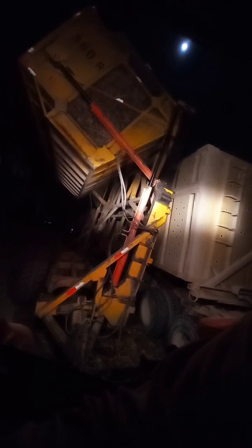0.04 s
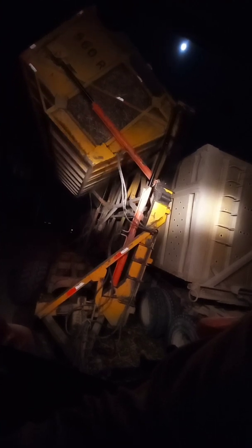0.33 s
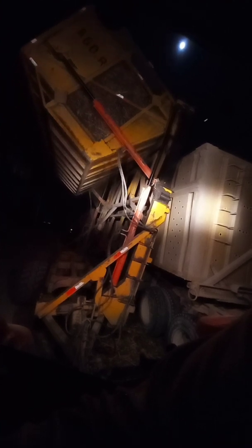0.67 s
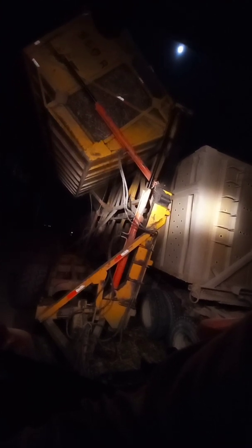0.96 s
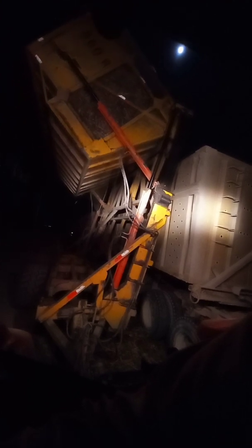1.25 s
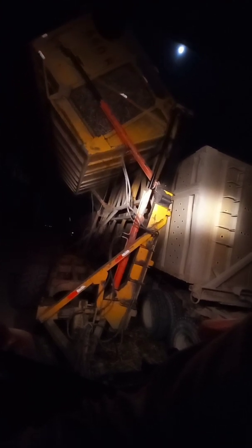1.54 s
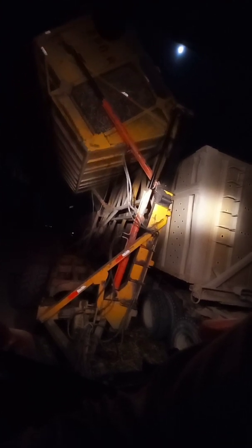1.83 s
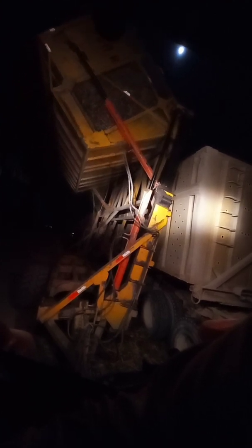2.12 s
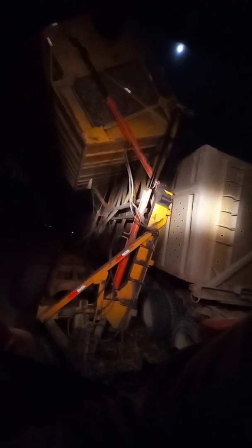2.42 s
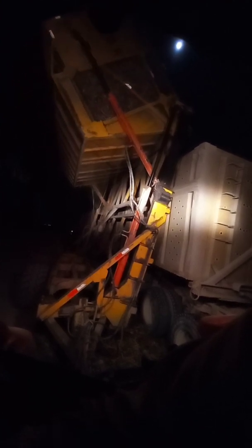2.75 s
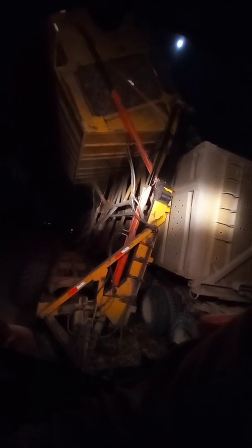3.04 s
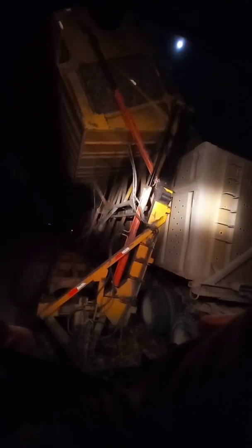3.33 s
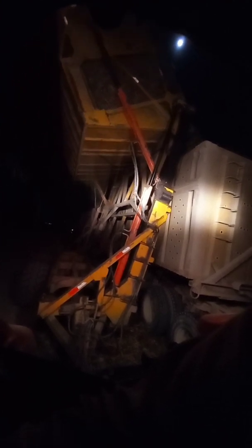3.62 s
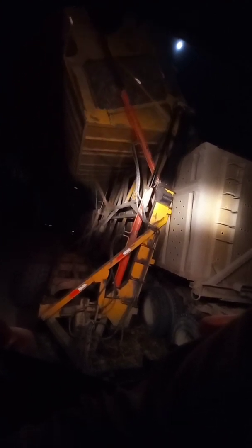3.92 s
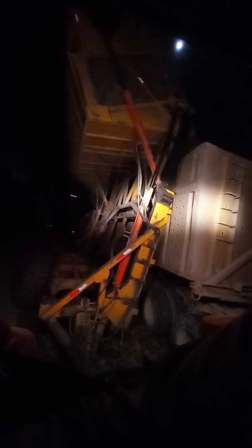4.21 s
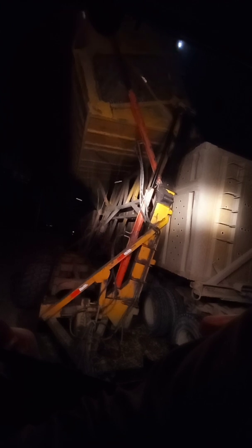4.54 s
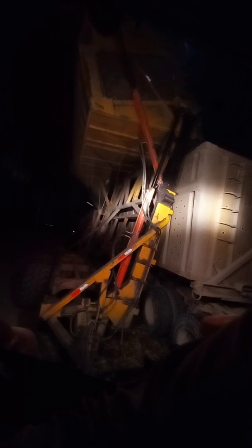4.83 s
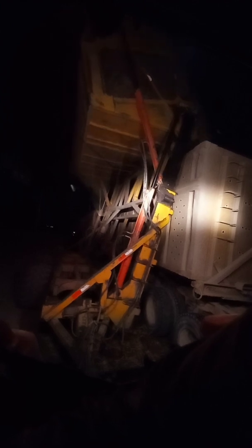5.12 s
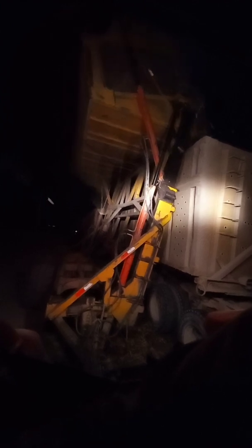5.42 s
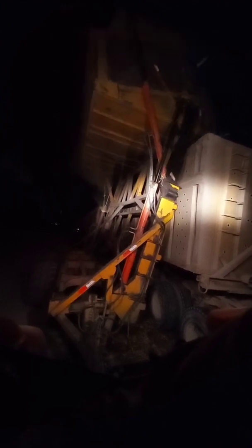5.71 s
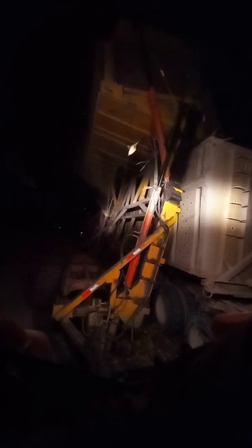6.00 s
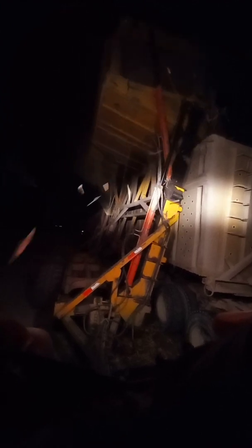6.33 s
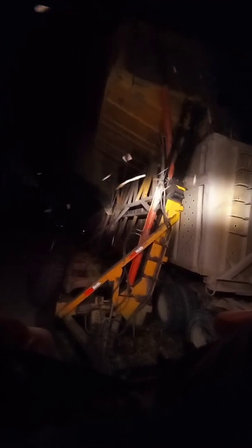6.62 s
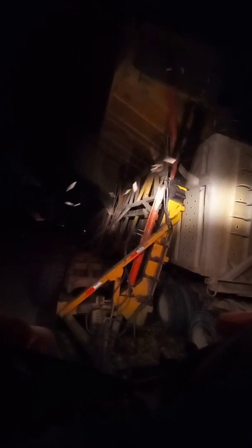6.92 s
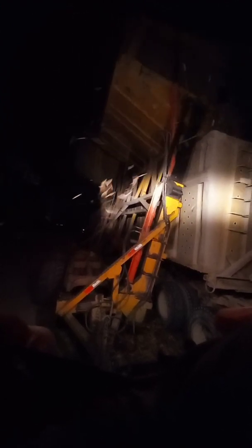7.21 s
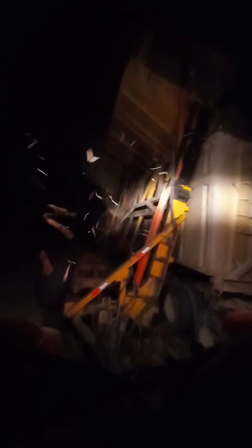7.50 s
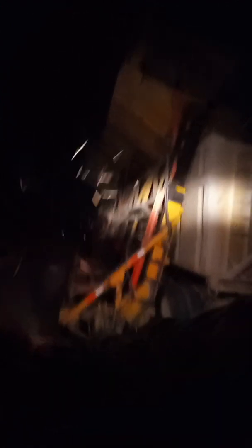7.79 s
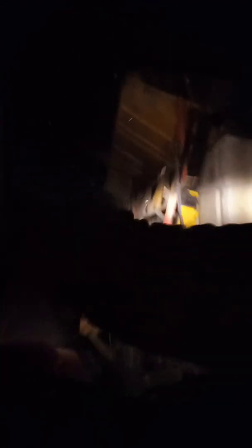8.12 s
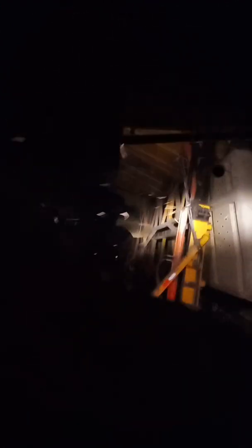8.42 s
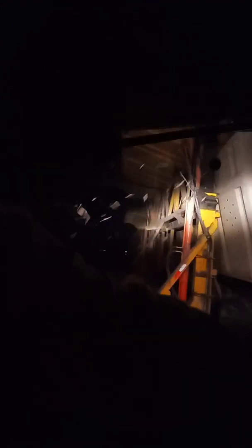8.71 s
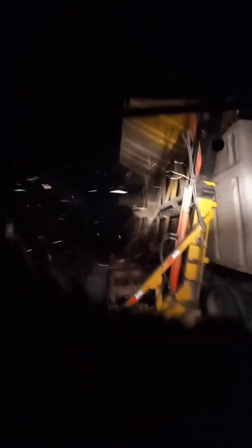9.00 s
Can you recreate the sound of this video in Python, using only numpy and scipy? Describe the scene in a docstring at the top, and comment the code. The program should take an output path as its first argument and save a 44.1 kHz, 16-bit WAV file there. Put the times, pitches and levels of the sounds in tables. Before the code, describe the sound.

Inside a harvester cab, a diesel engine drones low and steady under a hydraulic whine, mechanical clatter and faint hiss. The tones swell and shift between the ears as the engine speed creeps up. Near the end the engine slows and drops in pitch, something dry brushes past in short strokes, and the cab trim takes a faint knock, then a louder one.

```python
"""Harvester cab at night.

A six-cylinder diesel drones and what is likely a hydraulic gear pump whines. Their tones swell and
move between the ears as engine speed carries them across the cab's resonances, over clatter, roar
and hiss. Near the end the engine slows, something dry brushes past in short strokes, and the trim
takes a faint knock, then a louder one."""
import sys
import numpy as np
from scipy import signal
from scipy.fft import rfft, irfft
from scipy.io import wavfile
from scipy.ndimage import map_coordinates

SR = 44100
rng = np.random.default_rng(int(sys.argv[2]) if len(sys.argv) > 2 else 0)


def to_wav(sig):
    """Store sig (one row per channel, or 1-D mono) as 16-bit WAV at the path in sys.argv[1].

    Samples outside -1..1 are clipped; the rate is SR.
    """
    pcm = np.clip(np.atleast_2d(sig), -1, 1) * 32767
    pcm = np.round(pcm).astype(np.int16)
    wavfile.write(sys.argv[1], SR, pcm.T)  # frames by channels


N = 403515
TIME_S = np.arange(N) / SR
BINS_HZ = np.fft.rfftfreq(N, 1 / SR)
HOP = 200  # samples per control step


def amp(db):
    """dB to gain."""
    return 10 ** (np.asarray(db) / 20)


def unit(x):
    """Scale to rms 1."""
    return x / np.sqrt(np.mean(x ** 2) + 1e-20)


def curves(rows):
    """Table columns interpolated over time."""
    times_s, *columns = np.transpose(rows)
    return [np.interp(TIME_S, times_s, column) for column in columns]


def spectrum(points):
    """Table interpolated over log frequency, per bin."""
    hz, value = np.transpose(points)
    return np.interp(np.log(BINS_HZ + 1), np.log(hz + 1), value)


def noise():
    """Independent white noise per ear."""
    return rng.standard_normal((2, N))


def drift(rate_hz):
    """Smooth random wander, rms 1."""
    knots = rng.standard_normal(400)
    coarse_s = TIME_S[::HOP]
    wander = map_coordinates(knots, [coarse_s * rate_hz], mode="wrap")
    return np.interp(TIME_S, coarse_s, unit(wander))


def resonance(hz, centre_hz, width_hz):
    """Bell curve, peak 1; full width at half height."""
    return 1 / (1 + (2 * (hz - centre_hz) / width_hz) ** 2)


# Likeness of the two ears: f/Hz, correlation
EAR_CORRELATION = [(60, 0.99), (120, 0.8), (240, 0.67), (400, 0.6), (900, 0.3), (1300, -0.32),
                   (1900, -0.19), (2700, -0.025), (15000, 0.009)]


def diffuse(pair, shape_db):
    """Filter and blend two independent signals: alike in the bass, diffuse above; rms 1."""
    left, other = rfft(pair) * amp(shape_db)
    alike = np.clip(spectrum(EAR_CORRELATION), -1, 1)
    right = alike * left + np.sqrt(1 - alike ** 2) * other
    return unit(irfft(np.array([left, right]), N))


def partial(turns, level_db, waver_db, lead_rad=0):
    """Tone wavering in level and phase; the left ear leads by lead_rad."""
    phase = 2 * np.pi * (turns + rng.random()) + np.log(amp(waver_db)) * drift(9)
    gain = np.sqrt(2) * amp(level_db + waver_db * drift(7))
    return gain * np.array([np.cos(phase + lead_rad / 2), np.cos(phase - lead_rad / 2)])


def cab_partial(turns, modes, drive_db, direct_db, waver_db):
    """Tone that swells and shifts sideways as its pitch crosses each cab mode."""
    pitch_hz = np.gradient(turns)[::HOP] * SR
    side = np.array([[0.5], [-0.5]])
    response = amp(direct_db)
    for hz, width_hz, peak_db, pan_db, lead_rad in modes:
        peak = amp(drive_db + peak_db + side * pan_db) * np.exp(1j * side * lead_rad)
        response = response + peak * resonance(pitch_hz, hz, width_hz)
    phase = 2 * np.pi * (turns + rng.random()) + np.log(amp(waver_db)) * drift(12)
    tone = np.sqrt(2) * amp(waver_db * drift(7)) * np.exp(1j * phase)
    return np.array([(np.interp(TIME_S, TIME_S[::HOP], ear) * tone).real for ear in response])


# Crank speed: t/s, speed/rpm
CRANK_SPEED = [(0.0, 2047), (0.52, 2062), (0.99, 2098), (1.78, 2136), (2.64, 2159), (3.52, 2209),
               (3.96, 2219), (4.99, 2223), (5.42, 2181), (5.75, 2168), (7.06, 2160), (7.3, 2086),
               (7.6, 2067), (8.07, 1766), (8.22, 1705), (8.53, 1649), (8.79, 1643), (9.15, 1641)]
WORKING_RPM = 2170


def crank_rpm():
    """Engine speed per sample."""
    return curves(CRANK_SPEED)[0]


def effort_db(db_per_100_rpm):
    """Level offset that falls as the engine slows; zero at working speed."""
    return db_per_100_rpm * (crank_rpm() - WORKING_RPM) / 100


# Cab air modes: f/Hz, width/Hz, peak/dB, left-right/dB, left lead/rad
CAB_AIR_MODES = [(81.1, 5.1, -29.2, 4, 0.13), (105.15, 10.4, -19.5, 0.3, 0.23), (141, 20, -40, 3.5, -1.6),
                 (164.9, 8, -27.5, 2.5, -0.1), (181.5, 3.2, -37.1, -10.5, -1.3),
                 (216.3, 25.5, -30.5, -4, -1.14), (224.2, 11.4, -33, 5.5, 1.2),
                 (254, 16.8, -21.5, -1.5, -1.1)]
# Strong engine orders: order per cycle, mode drive/dB, direct/dB, waver/dB, trend/(dB/s)
FIRING_ORDERS = [(6, 1.5, -59.5, 0.6, -0.34), (9, -1, -65, 0.86, 0.09), (12, 3.5, -44, .5, 0.13),
                 (16, -10, -52, 0.3, 0)]
# Cylinder imbalance: order per cycle, level/dB
UNEVEN_ORDERS = [(7, -42.5), (8, -45.5), (10, -43), (11, -43.5), (13, -35), (14, -47), (20, -52), (24, -46),
                 (28, -54.5), (30, -46.5), (35, -52), (36, -47)]


def engine(cycles):
    """Six firings a cycle boom in the cab; unequal cylinders fill in the orders between."""
    out = np.zeros((2, N))
    for order, drive_db, direct_db, waver_db, trend_db_per_s in FIRING_ORDERS:
        boom = cab_partial(round(order) * cycles, CAB_AIR_MODES, drive_db, direct_db, waver_db)
        out += amp(trend_db_per_s * TIME_S) * boom
    for order, level_db in UNEVEN_ORDERS:
        out += partial(round(order) * cycles, level_db, waver_db=0.45)
    return out


# Clatter spectrum: f/Hz, relative level/dB
CLATTER_SPECTRUM = [(150, -26), (300, -5.5), (400, -1.5), (600, 1), (760, -8.5), (1100, -5), (1270, -14.5),
                    (1450, -12.5), (1900, -7.5), (2400, -19), (4500, -30), (7000, -44)]


def clatter(cycles, level_db=-37, size=4096):
    """Valve gear and injectors repeat one rattle every cycle, different at each ear."""
    patterns = irfft(np.exp(2j * np.pi * rng.random((2, size // 8))), size)
    position = cycles % 1 * size
    rattle = np.array([np.interp(position, np.arange(size), pattern) for pattern in patterns])
    return amp(level_db + effort_db(2)) * diffuse(rattle, spectrum(CLATTER_SPECTRUM))


# Engine and pump overtones on cab panels: order per engine cycle, panel f/Hz, width/Hz, peak/dB
PANEL_ORDERS = [(36, 648, 14, -42), (52.635, 974, 16, -42.5), (55, 996, 40, -44), (98, 1812, 34, -49),
                (172.26, 3108, 40, -62)]


def panels(cycles):
    """Each overtone sings only while it lies on its panel's resonance."""
    cycle_hz = np.gradient(cycles) * SR
    out = np.zeros((2, N))
    for order, hz, width_hz, peak_db in PANEL_ORDERS:
        level_db = peak_db + 10 * np.log10(resonance(order * cycle_hz, hz, width_hz))
        out += partial(order * cycles, level_db, waver_db=1.5, lead_rad=hz / 2000 * drift(1))
    return out


# Machinery roar through the cab walls: f/Hz, relative level/dB
ROAR_SPECTRUM = [(25, -24), (66, -15), (98, 5), (125, 2), (185, 0.5), (310, -5.5), (400, 0), (560, -6.5),
                 (740, -16.5), (1350, -17.5), (1650, -18.5), (2020, -10), (2450, -25), (4000, -40)]
# Narrow cab resonances in the roar: f/Hz, width/Hz, lift/dB
ROAR_MODES = [(767, 40, 5), (1090, 49, 3), (1633, 43, 7.5)]
# Thin hiss: f/Hz, relative level/dB
HISS_SPECTRUM = [(1500, -18), (2700, 2.5), (3700, -7.5), (5000, -9), (6200, -16), (7900, -19), (9000, -15),
                 (10300, -19), (13500, -21.5), (15000, -17.5), (15700, -24)]
# Level offsets with load: t/s, roar/dB, hiss/dB
LOAD_OFFSETS = [(0, 1, 3), (1, -2, 2), (2, -5, 1.5), (4, -1, 3.5), (5.1, 2, 6), (5.6, -1.5, 3),
                (7.1, -3.5, 2), (7.7, .5, 5), (8.6, 0, 2), (9.15, 1.5, 2.5)]


def roar(cycles, roar_db=-30, hiss_db=-56, throb_depth=0.085, chop_depth=0.21, cylinders=6):
    """Fan and combustion noise, throbbing once a cycle and chopped by each firing."""
    throb = 1 + throb_depth * np.cos(2 * np.pi * cycles)
    chop = 1 + chop_depth * np.cos(2 * np.pi * cylinders * cycles)
    pulse = throb * chop
    lift_db = sum(db * resonance(BINS_HZ, hz, width_hz) for hz, width_hz, db in ROAR_MODES)
    wall_db = -np.maximum(BINS_HZ - 4000, 0) / 100
    body = diffuse(pulse * noise(), spectrum(ROAR_SPECTRUM) + lift_db + wall_db)
    hiss = diffuse(pulse ** 0.25 * noise(), spectrum(HISS_SPECTRUM))
    roar_load_db, hiss_load_db = curves(LOAD_OFFSETS)
    body *= amp(roar_db + roar_load_db + 0.81 * drift(9.5))
    hiss *= amp(hiss_db + hiss_load_db + 0.46 * drift(18))
    return body + hiss


def turbo(level_db=-77, working_hz=9000, width_hz=520):
    """Faint fuzzy whistle, likely the turbocharger; pitch and level follow engine speed."""
    pitch_hz = working_hz * (crank_rpm() / WORKING_RPM) ** 1.3
    fuzz = diffuse(noise(), 20 * np.log10(resonance(BINS_HZ, 0, width_hz)))
    whistle = fuzz * np.cos(2 * np.pi * np.cumsum(pitch_hz) / SR)
    return amp(level_db + effort_db(3.5)) * unit(whistle)


# Standing waves between cab windows: f/Hz, width/Hz, peak/dB, left-right/dB, left lead/rad
WINDOW_MODES = [(417.2, 22.3, -20, 0, -0.5), (461, 25, -27, 8.5, -1), (508.7, 58, -33, 23.1, -5),
                (525, 44.9, -36.5, -19, 4.3), (819, 51.8, -46.5, 13.5, -1.5), (871, 32, -37.5, -7, -1),
                (987, 34.4, -33.5, 0, -0.9), (1055, 36, -51.5, 10.5, -3.5), (1181, 17, -39.5, -11.5, -2),
                (1470, 58.0, -50, 7.5, -3), (1615, 80.0, -41, -5, -4), (1883, 36, -37, -3, -2),
                (1958, 60.5, -36, -9.5, 3), (2006.0, 57.1, -43, -23.5, -5), (2071, 55, -41, -3, 0.15),
                (2126, 78, -36, -2, -4.4)]
# Tooth-rate whine: harmonic, mode drive/dB, direct/dB, waver/dB
WHINE_HARMONICS = [(1, 0.3, -51.5, 0.45), (2, 0.2, -60.5, 0.86), (3, -0.8, -52, 1.5), (4, 0, -51, 1.4),
                   (5, -6, -68.5, 2)]
# Unequal pump teeth: order per pump turn, level/dB
TOOTH_ORDERS = [(8, -51.5), (9, -46.5), (11, -60), (13, -52.5), (18, -52), (26, -59.5), (27, -64.5),
                (32, -58), (35, -63), (45, -53.5), (47, -53.5), (49, -56.5), (54, -66.5)]


def pump(cycles, turns_per_cycle=2.3925, teeth=12):
    """Meshing teeth whine; standing waves in the cab shift the sound between the ears."""
    turns = turns_per_cycle * cycles
    out = np.zeros((2, N))
    for harmonic, drive_db, direct_db, waver_db in WHINE_HARMONICS:
        out += cab_partial(round(harmonic) * teeth * turns, WINDOW_MODES, drive_db, direct_db, waver_db)
    ease_db = effort_db(1.5)
    for order, level_db in TOOTH_ORDERS:
        lead_rad = order / 24 * drift(0.6)
        out += partial(round(order) * turns, level_db + ease_db, waver_db=2, lead_rad=lead_rad)
    return out


def hum(cycles, order=14.76, level_db=-42, slip_turns=0.7):
    """Soft tone, perhaps a slipping belt drive, that comes up at the highest speeds."""
    turns = order * cycles + slip_turns * drift(2)
    return partial(turns, level_db + effort_db(12.5), waver_db=2)


# Dry strokes and ticks: t/s, length/s, rasp/dB, thud/dB, squeak/dB
BRUSH_STROKES = [(5.243, .007, -53, -52, -78), (6.731, .006, -54.5, -63, -80),
                 (7.244, 0.039, -72, -35, -84), (7.436, 0.0024, -40, -54, -80),
                 (7.439, 0.031, -47.5, -30.5, -80), (7.594, 0.044, -48.5, -50, -49),
                 (7.707, .04, -56, -47, -68), (7.8, 0.0016, -47, -60, -83), (7.816, 0.043, -49.5, -31, -68),
                 (7.883, 0.086, -58, -45, -63), (7.907, 0.04, -55, -36.5, -49.5),
                 (7.972, .45, -66, -62.5, -80), (8.249, 0.011, -52, -28.5, -67),
                 (8.75, 0.018, -62.5, -58, -83), (8.87, 0.049, -65, -59, -76)]
# Rasp spectrum: f/Hz, relative level/dB
RASP_SPECTRUM = [(800, -9.5), (2200, -0.5), (4200, -4.5), (5500, 1), (8000, 1), (9800, -4), (12000, 0.5),
                 (15700, -16)]


def brushes(squeak_hz=4150, squeak_width_hz=640, slip_samples=28):
    """Each stroke is a rush of tiny slips over a dull thud; some also squeak."""
    rasp_gain, thud_gain, squeak_gain = np.zeros((3, N))
    for start_s, length_s, rasp_db, thud_db, squeak_db in BRUSH_STROKES:
        progress = (TIME_S - start_s) / length_s
        attack = np.clip(progress / 0.081, 0, 1)
        envelope = attack * np.exp(-np.maximum(progress - 1.06, 0) / 0.3)
        rasp_gain += amp(rasp_db) * envelope
        thud_gain += amp(thud_db) * envelope
        squeak_gain += amp(squeak_db) * envelope
    slip_db = 4.5 * np.minimum(rng.exponential(1, N), 4)
    slips = amp(np.repeat(slip_db, slip_samples)[:N])
    rasp = diffuse(slips * noise(), spectrum(RASP_SPECTRUM))
    dull_db = spectrum([(100, -22), (350, 2.5), (800, -1.5), (2000, -9.5), (4000, -25), (12000, -51)])
    thud = diffuse(noise(), dull_db)
    squeak = diffuse(noise(), 20 * np.log10(resonance(BINS_HZ, squeak_hz, squeak_width_hz)))
    return rasp_gain * rasp + thud_gain * thud + squeak_gain * squeak


# Blows on the cab: t/s, level/dB
CAB_BLOWS = [(7.925, -33), (8.253, -21)]
# Trim modes: f/Hz, relative level/dB, t60/s
TRIM_MODES = [(237, 2.5, 0.14), (567, -8, 0.08), (700, -4, 0.074), (970, -7.5, 0.1), (1057, -8, 0.078),
              (1570, -6, 0.031), (1920, -8, 0.18), (2256, -11.5, 0.06), (2890, -14, .05), (3510, -18, .04),
              (4680, -24, .04)]


def knocks(attack_s=0.0013):
    """Short blows ring the cab trim."""
    out = np.zeros((2, N))
    age_s = np.arange(SR // 4) / SR
    attack = 1 - np.exp(-age_s / attack_s)
    for start_s, level_db in CAB_BLOWS:
        start = round(start_s * SR)
        for hz, mode_db, t60_s in TRIM_MODES:
            ring = np.sin(2 * np.pi * hz * age_s + rng.uniform(-1.5, 1, (2, 1)))
            envelope = attack * amp(level_db + mode_db - 60 * age_s / t60_s)
            out[:, start:start + len(age_s)] += envelope * ring
    return out


def scene():
    """One crank speed drives all the machinery; a four-stroke cycle takes two turns."""
    cycles = np.cumsum(crank_rpm()) / (2 * 60 * SR)
    machinery = engine(cycles) + clatter(cycles) + panels(cycles) + roar(cycles) + turbo()
    return machinery + pump(cycles) + hum(cycles) + brushes() + knocks()


def record(dry):
    """Steep low-pass at 15.75 kHz."""
    lowpass = signal.firwin(511, 15750, window=("kaiser", 9), fs=SR)
    return signal.oaconvolve(dry, lowpass[None], "same")


dry = scene()
out = record(dry)
to_wav(out)
```